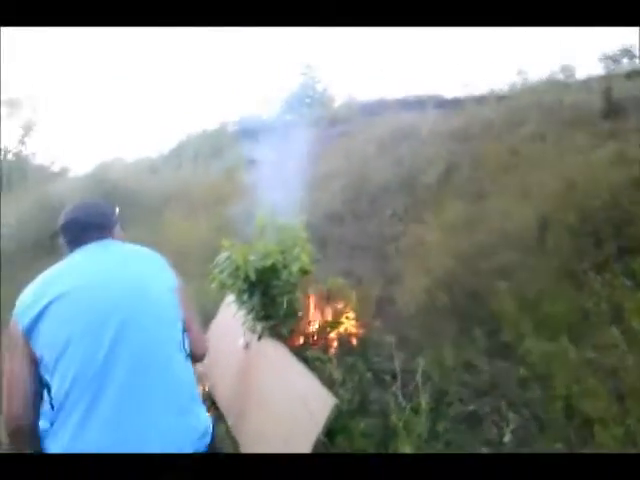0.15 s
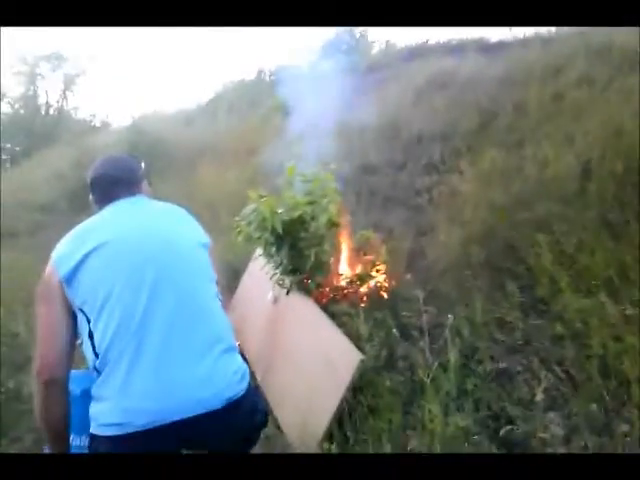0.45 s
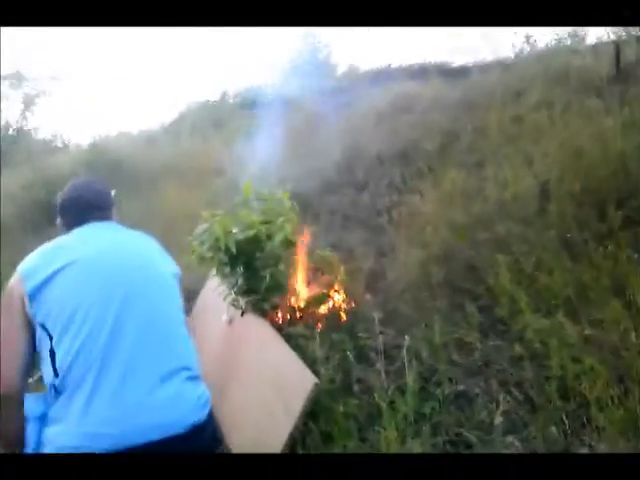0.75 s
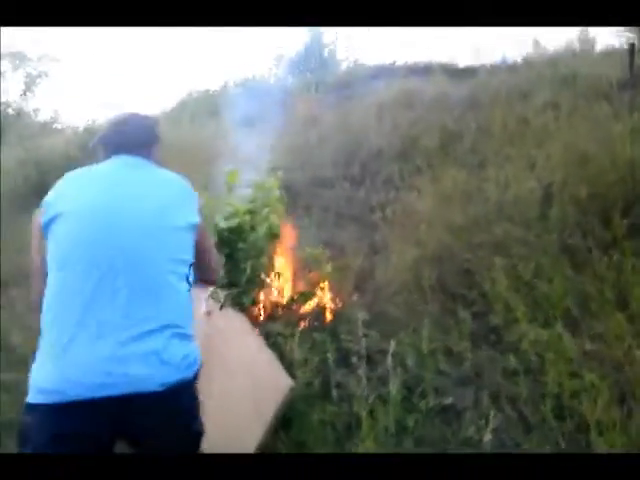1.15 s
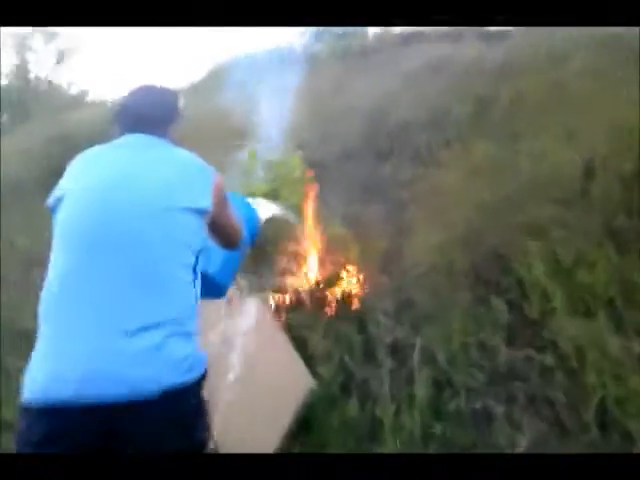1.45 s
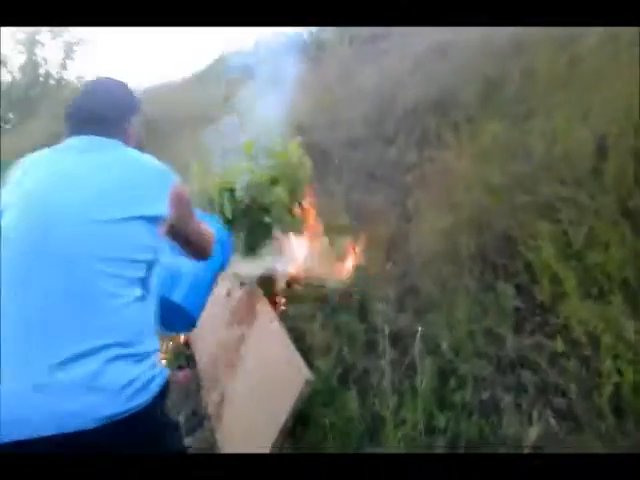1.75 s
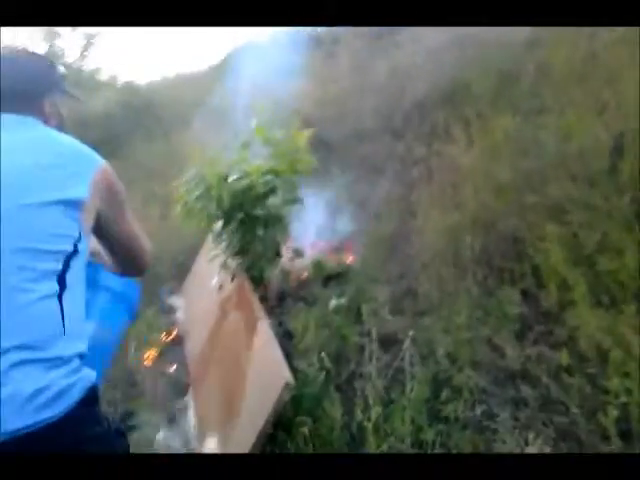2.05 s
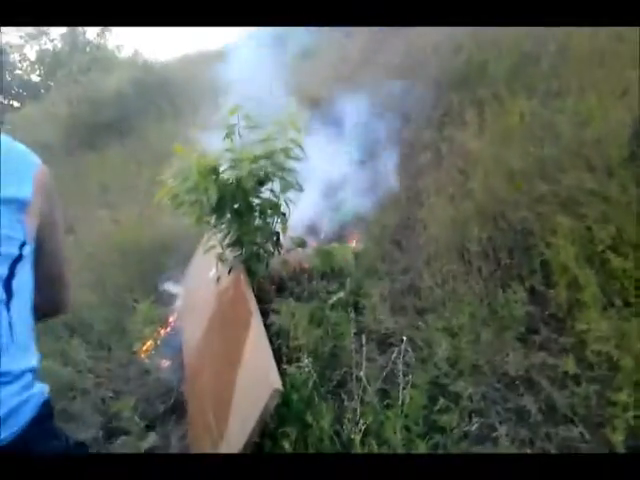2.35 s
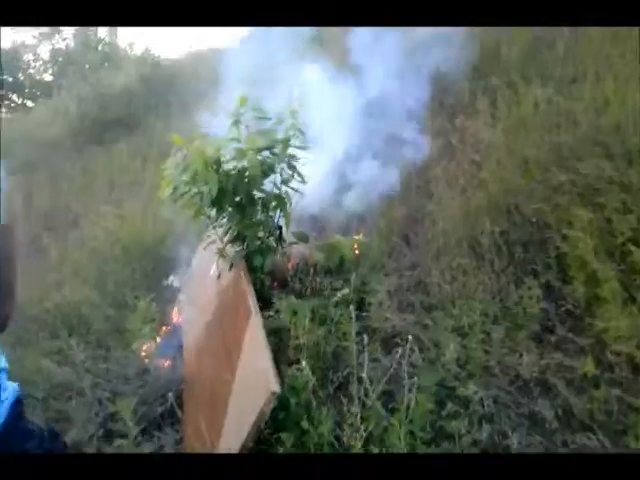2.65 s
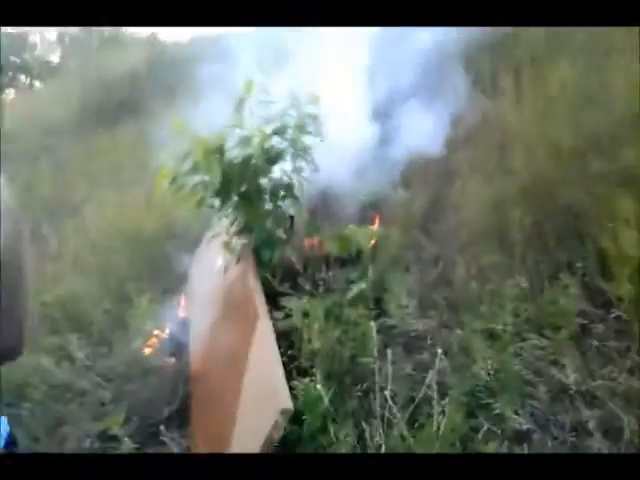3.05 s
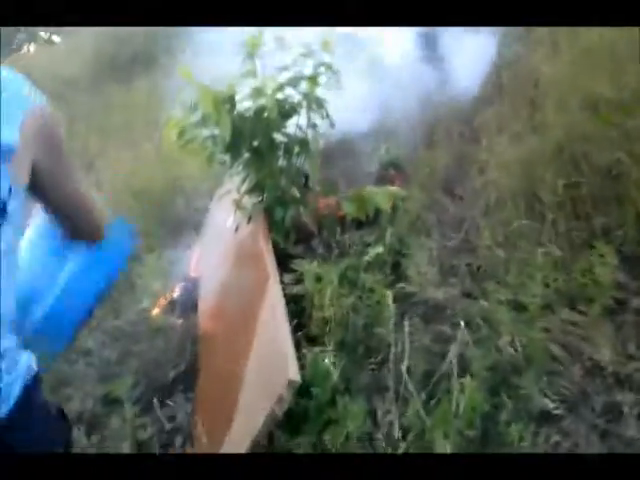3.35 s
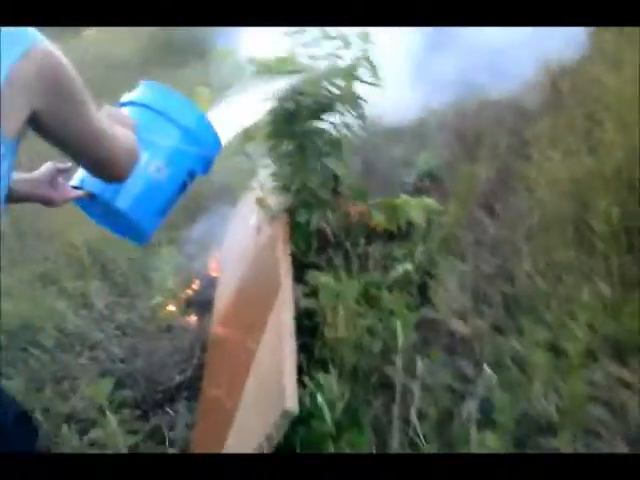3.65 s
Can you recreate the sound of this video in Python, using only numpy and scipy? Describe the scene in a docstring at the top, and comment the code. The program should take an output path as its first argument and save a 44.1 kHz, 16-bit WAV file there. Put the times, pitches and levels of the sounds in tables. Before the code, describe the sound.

Small brush fire crackling with rapid sharp pops, doused by a bucket of water, hissing steam

```python
"""Grassy slope: a small brush fire a few metres off. Stems burst in sharp pops (spike pairs with noise tails)
over fine crackle (random spikes with short bursts) and hiss (flickering noise bands). A thrown bucket of water
slaps and sloshes (noise swells) and gulps (low tones); steam hisses up, then the pops thin out. Dull knocks are
damped rings. Light wind rumbles underneath (low noise). The fire's colour peaks near 5.5 kHz."""
import sys
import numpy as np
from scipy import signal
from scipy.fft import rfft, irfft
from scipy.io import wavfile
from scipy.ndimage import uniform_filter1d

SR = 44100
rng = np.random.default_rng(int(sys.argv[2]) if len(sys.argv) > 2 else 0)


def int16_out(signal):
    """Quantize to a 16-bit WAV file."""
    q = np.round(np.clip(np.atleast_2d(signal).T, -1, 1) * 32767)
    wavfile.write(sys.argv[1], SR, q.astype(np.int16))


N = 167580

BODY_HZ, EDGE_HZ = 2900, 7200  # band limits: body below, edge above


def undb(db):
    """Gain of a level in dB."""
    return 10 ** (np.asarray(db) / 20)


def unit(x):
    """Scale to rms 1."""
    return x / np.sqrt(np.mean(x ** 2))


def curve(table, column=1):
    """Column of a table, as straight lines over time."""
    table = np.array(table)
    return np.interp(np.arange(N) / SR, table[:, 0], table[:, column])


def response(points):
    """Minimum-phase impulse response of unit energy with the given (Hz, dB) colour."""
    hz, db = np.array(points, float).T
    bin_hz = np.arange(2049) * SR / 4096
    log_gain = np.interp(np.log(bin_hz + 1), np.log(hz), db) * np.log(10) / 20
    cepstrum = irfft(log_gain)
    # folding the cepstrum makes the response causal
    folded = np.r_[cepstrum[0], 2 * cepstrum[1:2048], np.zeros(2048)]
    h = irfft(np.exp(rfft(folded)))[:2048]
    return h / np.sqrt(np.sum(h ** 2))


def resonate(x, hz, width_hz):
    """Resonant band-pass, unity gain at its centre."""
    return signal.lfilter(*signal.iirpeak(hz, hz / width_hz, fs=SR), x)


def split(x):
    """Body, middle and edge bands that sum to the whole."""
    low = signal.sosfiltfilt(signal.butter(2, BODY_HZ, fs=SR, output="sos"), x)
    high = signal.sosfiltfilt(signal.butter(2, EDGE_HZ, "high", fs=SR, output="sos"), x)
    return low, x - low - high, high


def walk(rate_hz):
    """Random levels held 1 / rate_hz and slewed twice; spread near 1."""
    hold = int(SR / rate_hz)
    steps = np.repeat(rng.standard_normal(N // hold + 1), hold)
    slewed = uniform_filter1d(uniform_filter1d(steps, hold), hold)
    return unit(slewed[:N])


# Sizzle and steam before the overall colour. Each row: time in seconds, level in dB, lows and highs in dB
# relative to that level.
HISS_LEVELS = [(0, -47.5, 3.5, 5.5), (.5, -48, 1.5, 10), (.9, -40, -1.5, 5), (1.4, -43, 0, 5.5),
               (1.7, -42, -2.5, 1.5), (1.84, -31, -1.5, 0.5), (1.96, -31.5, 3, -0.5), (2.08, -27, 0, -3),
               (2.22, -27.5, -2, -6), (2.37, -38, 2, -1.5), (2.65, -39.5, -3.5, -2.5),
               (3.04, -44, 1.5, -1.5), (3.15, -49, -2, -5.5), (3.47, -45.5, 0.5, -1), (3.66, -40.5, -1, -4)]
SPIT_DB, SPIT_PER_S = 2, 800
FLICKER_DB, FLICKER_PER_S = 1.2, 60


def hiss():
    """Sizzle of sap and steam: three noise bands that spit together and flicker alone."""
    shared_db = curve(HISS_LEVELS) + SPIT_DB * walk(SPIT_PER_S)
    shades_db = curve(HISS_LEVELS, 2), 0, curve(HISS_LEVELS, 3)
    out = np.zeros(N)
    for band, shade_db in zip(split(rng.standard_normal(N)), shades_db):
        out += band * undb(shared_db + shade_db + FLICKER_DB * walk(FLICKER_PER_S))
    return out


# Strength of the small snaps. Each row: time in seconds, level in dB.
CRACKLE_LEVELS = [(0, -36), (1.7, -31), (2.1, -42), (2.4, -43), (3.4, -53), (3.6, -32.5)]
CRACKLE_PER_S, CRACKLE_T60_S = 300, 0.0041
CRACKLE_SPREAD_DB, CRACKLE_MAX_DB = 4.5, 14  # scale and ceiling of the random boost
FLURRY_DB, FLURRY_PER_S = 3.05, 10.5
SHADE_RANGE_DB = 18  # full range of the random body and edge tilt
SNAP_DB = 0  # first spike relative to its burst
SNAP_BODY_DB = -2.5  # mean body relative to the middle


def crackle():
    """Small snaps in flurries, each a spike and a tiny noise burst of random brightness; three bands."""
    place, size, body, edge = rng.random((int(CRACKLE_PER_S * N / SR), 4)).T
    at = (place * N).astype(int)
    size_db = np.minimum(-CRACKLE_SPREAD_DB * np.log(1 - size), CRACKLE_MAX_DB)
    fade = undb(-60 / (CRACKLE_T60_S * SR))  # per sample
    level = undb(curve(CRACKLE_LEVELS) + FLURRY_DB * walk(FLURRY_PER_S)) / 2
    noise = rng.standard_normal(N)
    body_db = SNAP_BODY_DB + SHADE_RANGE_DB * (body - .5)
    edge_db = SHADE_RANGE_DB * (edge - .5)
    bands = []
    for k, shade_db in enumerate((body_db, 0, edge_db)):
        spikes = np.bincount(at, undb(size_db + shade_db), N)
        bursts = signal.lfilter([1], [1, -fade], spikes) * noise
        snaps = (bursts - undb(SNAP_DB) * spikes) * level
        bands.append(split(snaps)[k])
    return bands


# Wind and flame rumble. Each row: time in seconds, level in dB.
WIND_LEVELS = [(0, -51.5), (.13, -61), (.86, -57.5), (1.08, -56), (1.35, -54), (2.0, -69), (2.4, -93),
               (2.78, -58), (2.92, -68), (3.3, -68.5)]
# Rumble spectrum. Each row: frequency in Hz, relative density in dB per Hz.
WIND_SPECTRUM = [(20, -10), (35, -2), (70, -2), (130, -4), (250, -7.5), (600, -28.5)]
AIR_HZ, AIR_DB = 784, -67  # distant murmur of the countryside


def wind():
    """Gusty low noise of wind and flame over a faint distant murmur of band noise."""
    rumble = signal.fftconvolve(rng.standard_normal(N), response(WIND_SPECTRUM))[:N]
    murmur = unit(resonate(rng.standard_normal(N), AIR_HZ, AIR_HZ))
    return rumble * undb(curve(WIND_LEVELS) + 2 * walk(20)) + murmur * undb(AIR_DB + walk(13))


# Overall colour of the fire sound, with a steep top limit near 16 kHz.
# Each row: frequency in Hz, relative gain in dB.
FIRE_COLOUR = [(100, -19), (500, -15), (1000, -13.5), (1800, -7.5), (3200, -7), (4600, -4), (5600, 0),
               (6100, -2), (6700, -8.5), (8700, -13), (10000, -20), (12000, -18.5), (15000, -17.5),
               (15900, -16.5), (16200, -34)]


def fire_colour():
    """Impulse response of the fire's overall colour, with its peak near 5.5 kHz."""
    return response(FIRE_COLOUR)


# Loudest pops. Each row: start in seconds, spike level in dB before band shading and low cut,
# body and edge bands in dB relative to the middle.
POP_EVENTS = [(0.046, -13, 6.5, 10), (0.0553, -7, 2.5, -1), (0.0661, -10.5, -6, 2), (0.085, -24, -10, 4),
              (0.0954, -7.5, -8, 8.5), (0.1023, -9, -5, 2), (0.1253, -21, -6, 4.5), (0.1555, -16, -9, 3.5),
              (0.1839, 8, -3, -13), (0.228, 5, -7.5, -31), (0.2409, -16.5, 6, 5), (0.279, -8, 5.5, 3.5),
              (0.3196, -6.5, -4.5, 2), (0.3258, -9.5, -7, 2), (0.4166, -17, 3, 8), (0.4475, 3, -12.5, 0),
              (0.5118, -31, 3, 11), (0.5176, -28, 2, 3), (0.574, -10, -1.5, 3), (0.602, -6, -2, 0.5),
              (0.6109, -5.5, -1.5, 7), (0.6156, -23, 5, 7), (0.6261, -17, 2.5, -12), (0.695, -13, -5.5, 3),
              (0.701, -12, -6, -6), (0.7101, -16, -3, -2), (0.7207, -17, 4, 3), (0.7437, -20.5, 6.5, 6),
              (0.7638, -7, -10.5, -1.5), (0.8451, -11, -6, -6), (0.871, -36, -15, 16.5),
              (0.893, -13.5, 8.5, 5.5), (0.9115, -2.5, -14, -4), (0.9196, -10, -17, -8),
              (0.9259, -8.5, -3.5, 1.5), (0.9784, 5.5, -4, 3), (0.9954, -9.5, 6, 11), (1.0157, -2.5, 1, -1),
              (1.0737, -19, -15, 1), (1.0873, -7, -4, -7), (1.0903, -25, -9, 8), (1.161, -8, -10, -0.5),
              (1.2554, -11, -2, 0), (1.2595, -9, -3, 3.5), (1.2652, -6.5, 8, 4.5), (1.3116, -25, -1, 4),
              (1.3243, -12.5, 8.5, 0), (1.33, -4, -8, 2), (1.3974, -19.5, 7, 6), (1.423, -1.5, -2, -17),
              (1.4371, -6.5, 4, -0.5), (1.5049, -14, 7, 6), (1.557, -34, 1.5, -1), (1.6551, -16, 8.5, 8.5),
              (1.66, -8, -8, -10), (1.671, -2.5, 3.5, -12), (1.7163, -5.5, 5, -5), (1.76, -19.5, 7, 9.5),
              (1.835, 2.5, -2.5, 0.5), (1.852, -12, 1, 3), (1.864, -22, -10, 4), (1.924, -19.5, -8, 12),
              (2.075, -12, 3, -3), (2.2544, -10, 2, -6), (2.572, -26, 3.5, -6), (2.6, -19.5, 7.5, -4),
              (2.8406, -2, 3.5, -7.5), (3.0968, 2.5, 2.5, -7.5), (3.115, -8, 2, -0.5),
              (3.2857, -41, -2.5, -10), (3.5005, -15.5, -4.5, -13), (3.529, -25.5, 4, 4),
              (3.552, -23, 7.5, 7.5), (3.6153, 3.5, 6.5, -10), (3.6183, -8.5, 6.5, -7),
              (3.7525, -6.5, 1.5, 2.5), (3.7902, -15, -1, 4.5)]
TAIL_T60_S, HAZE_T60_S = .013, .035
TAIL_DB, TAIL_PER_DB = -19, 0.2  # splinter tail at 0 dB spike level; its dB per dB of spike
HAZE_DB = -33  # relative to the spike level
POP_LOW_CUT_HZ = 607


def pops():
    """Bursting stems: a double pressure spike, milliseconds of splintering, faint grass haze; three bands."""
    t = np.arange(4096) / SR
    out = np.zeros((3, N + len(t)))
    spike = 1 / np.max(np.abs(fire_colour()))  # peaks at 1 once coloured
    for start_s, peak_db, body_db, edge_db in POP_EVENTS:
        grain, unevenness, haze = rng.standard_normal((3, len(t)))
        delay, strength = rng.random(2)
        splinters = unit(grain * undb(16.4 * uniform_filter1d(unevenness, size=9)))
        tail_db = TAIL_DB + TAIL_PER_DB * peak_db - peak_db
        pop = undb(tail_db - 60 * t / TAIL_T60_S) * splinters
        pop += undb(HAZE_DB - 60 * t / HAZE_T60_S) * haze
        pop[0] = -spike
        pop[6 + int(8 * delay)] -= .7 * spike * strength
        i = int(start_s * SR)
        out[:, i:i + len(t)] += pop * undb(peak_db + np.array([[body_db], [0], [edge_db]]))
    out = signal.lfilter(*signal.butter(2, POP_LOW_CUT_HZ, "high", fs=SR), out)
    return [split(out[k, :N])[k] for k in range(3)]


# Damp stems giving way, water thudding down, wind bumping the microphone. Each row: start in seconds,
# frequency in Hz, initial level in dB before the resonance, cycles to fall 30 dB.
KNOCK_EVENTS = [(0.194, 50, -42.5, 3), (0.208, 400, -32, 1.8), (0.558, 380, -32, 2.3),
                (1.083, 58.3, -39, 4.3), (1.398, 380, -32, 2.2), (1.437, 420, -35.5, 4.3),
                (1.716, 390, -24, 2.3), (2.071, 334, -26.5, 2.8), (3.599, 305, -26.5, 1.8)]


def knocks():
    """Dull knocks: low rings that die within a few cycles."""
    t, out = np.arange(N) / SR, np.zeros(N)
    for start_s, hz, level_db, cycles in KNOCK_EVENTS:
        turns = hz * np.maximum(t - start_s, 0)
        fade_db = -60 * np.minimum(turns / cycles / 2, 5)
        ring = undb(level_db + fade_db) * np.sin(2 * np.pi * turns)
        out += resonate(ring, hz, hz)
    return out


# Water slopping and slapping on leaves, board and ground. Each row: peak time in seconds, length in seconds,
# centre in Hz, width of each filter pass in Hz, level in dB.
SPLASH_EVENTS = [(1.595, 0.055, 450, 650, -43.5), (1.596, 0.039, 2340, 4170, -36.5),
                 (1.833, 1, 211, 261, -60), (1.978, 0.043, 950, 910, -33),
                 (2.073, 0.012, 1410, 1200, -28.5), (2.423, 0.026, 790, 1230, -45),
                 (3.048, 0.03, 676, 450, -47.5)]
SPLASH_ATTACK = 0.72  # rise as a share of fall


def splashes():
    """Water slaps and one long low slosh: swells of band noise."""
    t, out = np.arange(N) / SR, np.zeros(N)
    for peak_s, length_s, hz, width_hz, level_db in SPLASH_EVENTS:
        stretch = np.where(t < peak_s, SPLASH_ATTACK, 1)
        shape = np.exp(-(2 * (t - peak_s) / length_s / stretch) ** 2)
        noise = resonate(rng.standard_normal(N), hz, width_hz)
        splash = shape * resonate(noise, hz, width_hz)
        out += undb(level_db) * splash * np.sqrt(np.sum(shape ** 2) / np.sum(splash ** 2))
    return out


# Hollow gulps of the emptying bucket. Each row: centre in seconds, frequency in Hz,
# mean level in dB before the swell, length in seconds.
GULP_EVENTS = [(2.324, 270, -36, 0.023), (3.636, 237, -39.5, 0.047)]
GULP_GLIDE = -0.044  # share by which pitch moves over one length


def gulps():
    """Bucket gulps: rounded low tones that bend slightly down."""
    t, out = np.arange(N) / SR, np.zeros(N)
    for centre_s, hz, level_db, length_s in GULP_EVENTS:
        dt = t - centre_s
        turns = hz * dt * (1 + GULP_GLIDE * dt / length_s / 2)
        swell = np.exp(-(2 * dt / length_s) ** 2)
        out += undb(level_db + 3.8 * walk(90)) * swell * np.sin(2 * np.pi * turns)
    return out


# Dips from the camera body. Each row: centre in Hz, width in Hz.
BODY_DIPS = [(2850, 600), (13500, 900)]
# The dips fill in as the camera turns. Each row: time in seconds, depth from 0 to 1.
BODY_DIP_DEPTH = [(0, 0.77), (2.2, 0.83), (2.9, 0.083)]
LATE_DIP_HZ, LATE_DIP_WIDTH_HZ, LATE_DIP_DEPTH = 2570, 2200, 0.31  # opens as the others fill in


def camera_dips(fire):
    """Subtract resonant bands of the fire; their depths follow the turning camera."""
    depth = np.clip(curve(BODY_DIP_DEPTH), 0, 1)
    early = sum(resonate(fire, hz, width_hz) for hz, width_hz in BODY_DIPS)
    late = resonate(fire, LATE_DIP_HZ, LATE_DIP_WIDTH_HZ)
    return fire - depth * early - LATE_DIP_DEPTH * (1 - depth) * late


SIDE_HZ, SIDE_POP_DB, SIDE_EDGE_DB, SIDE_LOW_DB = 2370, -18.5, -13, -25.5


def side(x, level_db):
    """A faint left-right difference, opposite in the two channels: a lagged copy at a wandering level."""
    return undb(level_db) * np.roll(x, 40) * walk(12) * np.array([[1], [-1]])


def scene():
    """Fire through dips and colour, plus uncoloured water, knocks and wind; the channels differ a little."""
    body, middle, edge = (pop + snap for pop, snap in zip(pops(), crackle()))
    fire = body + middle + edge + hiss()
    fire = fire + side(resonate(body, SIDE_HZ, SIDE_HZ), SIDE_POP_DB) + side(edge, SIDE_EDGE_DB)
    low = splashes() + gulps() + knocks() + wind()
    low = low + side(low, SIDE_LOW_DB)
    return signal.fftconvolve(camera_dips(fire), fire_colour()[None])[:, :N] + low


TOP_HZ = 16900


def record(dry):
    """Clip near full scale, then cut the top with a steep low-pass."""
    low_pass = signal.ellip(10, .2, 70, TOP_HZ, fs=SR, output="sos")
    return signal.sosfilt(low_pass, np.clip(dry, -.95, .95))


dry = scene()
out = record(dry)
int16_out(out)
```